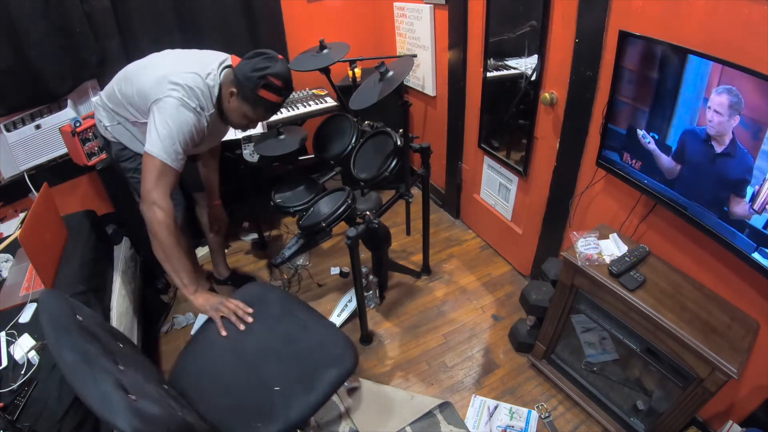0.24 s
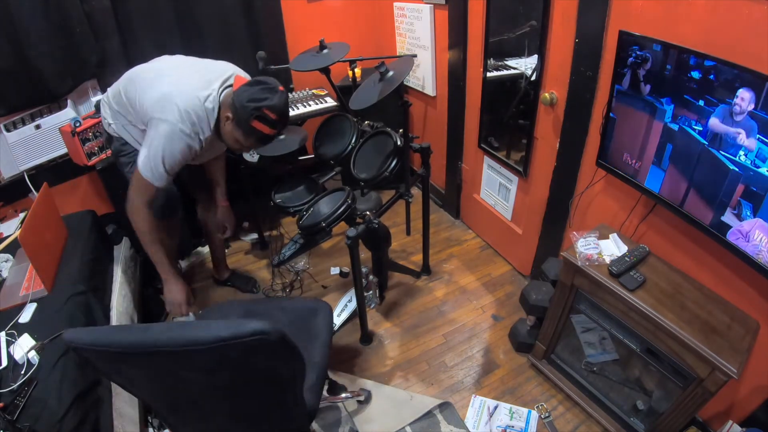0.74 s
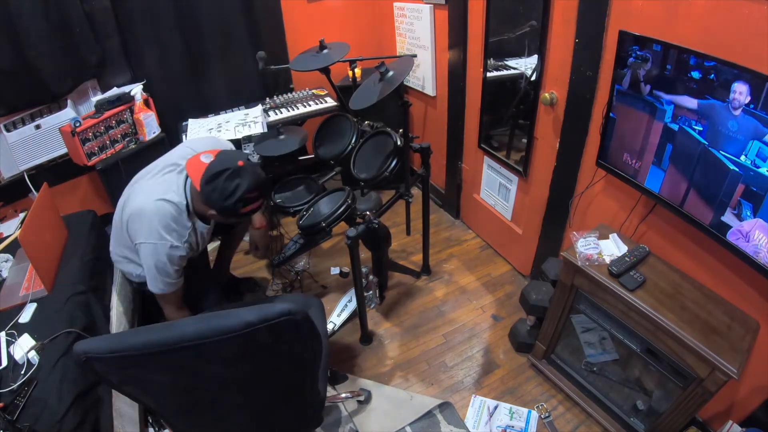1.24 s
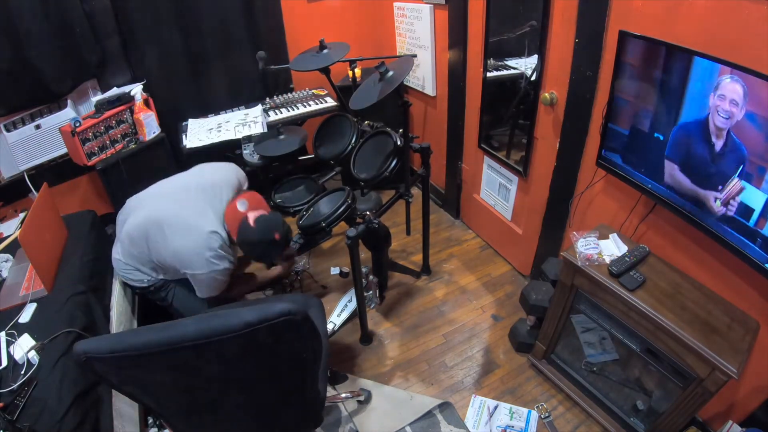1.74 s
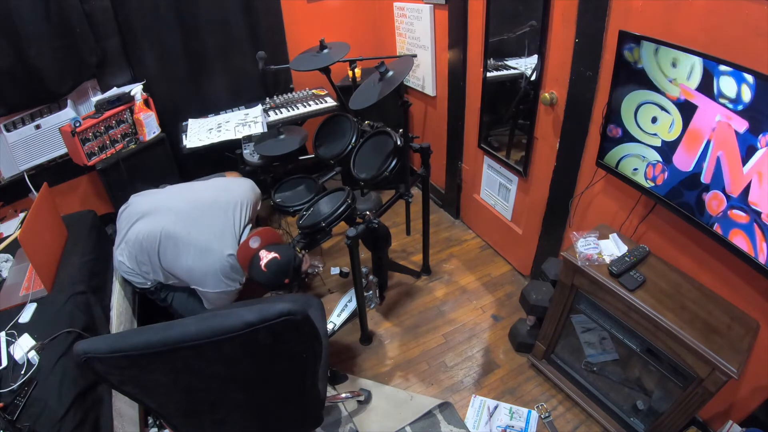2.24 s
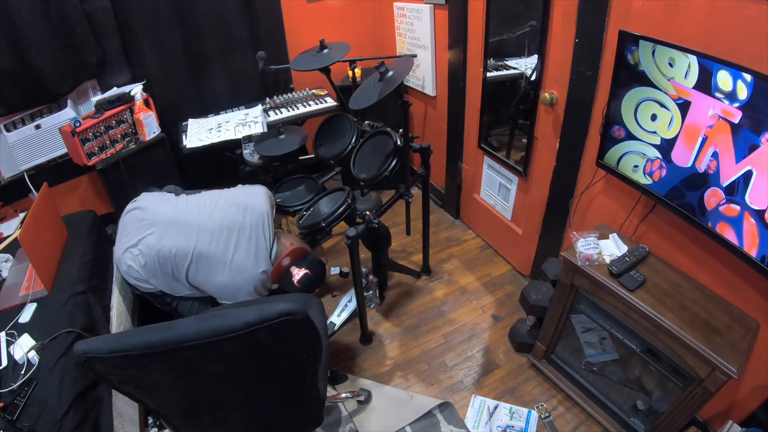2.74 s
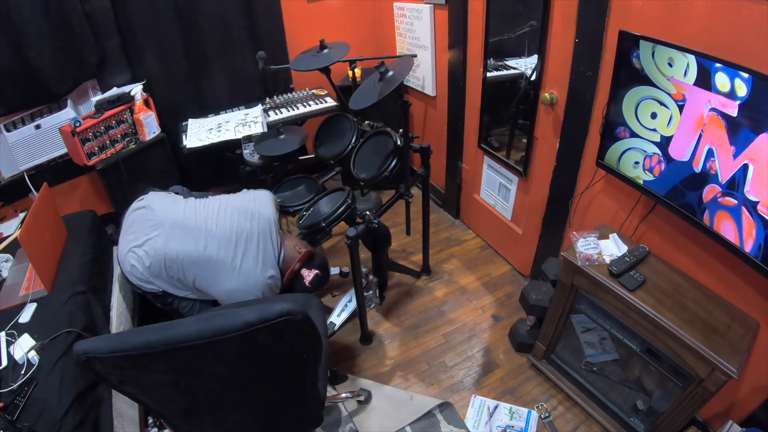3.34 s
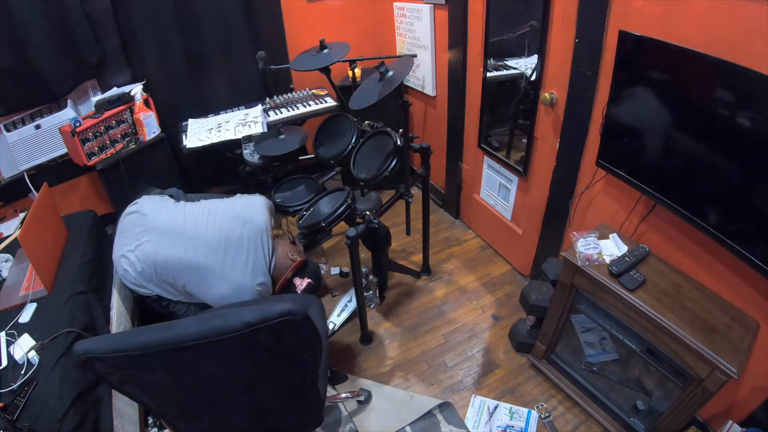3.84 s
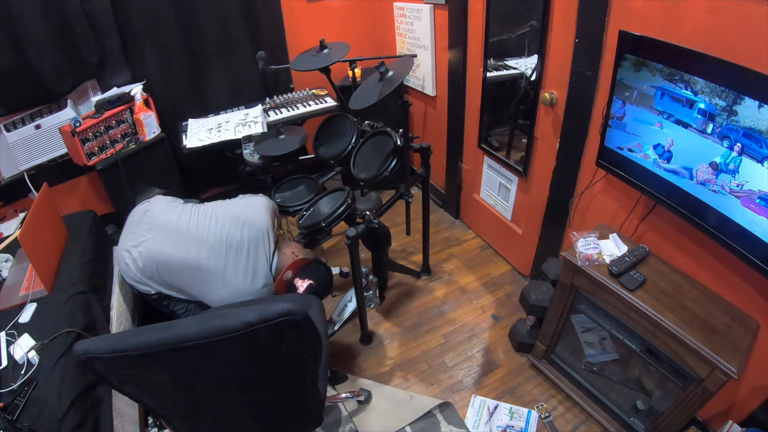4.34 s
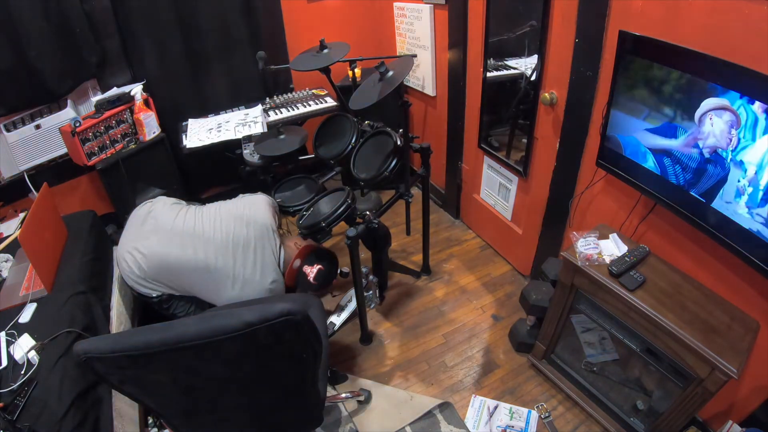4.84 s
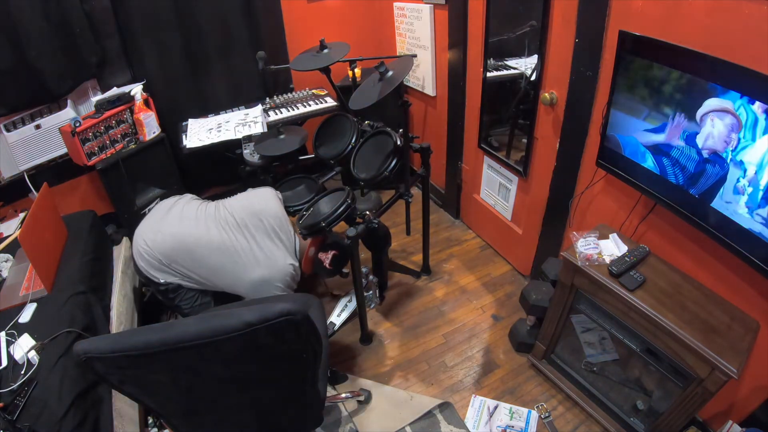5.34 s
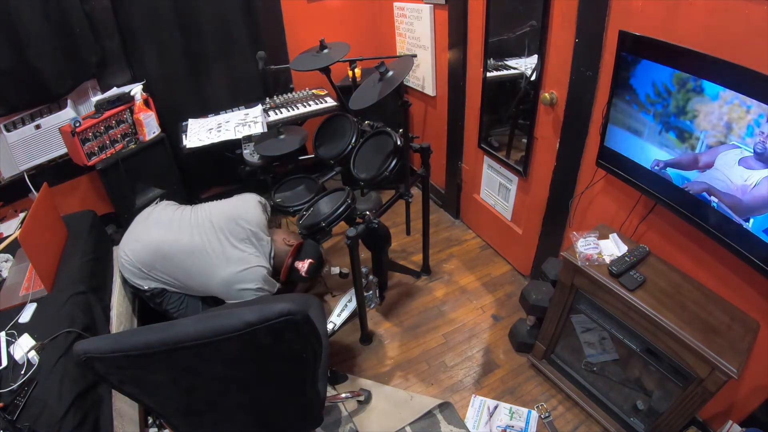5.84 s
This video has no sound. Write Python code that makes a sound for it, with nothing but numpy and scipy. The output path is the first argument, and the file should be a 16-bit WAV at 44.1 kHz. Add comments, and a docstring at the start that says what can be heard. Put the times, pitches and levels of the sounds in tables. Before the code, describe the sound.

Cloth and cables rustle as hard parts knock on a wooden floor, with a brief metallic rattle early and a heavy low thump late.

```python
"""Someone pushes a chair aside and kneels on a wooden floor to handle stands and cables in a small, damped
room. Cloth and cables rub: noise made of tiny slips. Hard parts knock and scuff: short noise bursts that set
parts ringing. Other parts creak or ring as brief tones, and a loose metal part rattles as a run of short pings.
Feet and knees thump the boards: soft pushes set low floor tones ringing. A faint hum of air, made of coloured
noise, lies below."""
import sys
import numpy as np
from scipy import signal
from scipy.fft import rfft, irfft
from scipy.io import wavfile
from scipy.ndimage import uniform_filter1d

SR = 44100
rng = np.random.default_rng(int(sys.argv[2]) if len(sys.argv) > 2 else 0)


def transcribe(u):
    """Save the signal u as a 16-bit wav file named by the first command-line argument.

    u: samples, shape (n,) or (channels, n), limited to [-1, 1]; the rate is SR.
    q: integer samples, one column per channel.
    """
    v = np.clip(np.atleast_2d(u).T, -1, 1)
    q = np.round(v * 32767).astype(np.int16)
    wavfile.write(sys.argv[1], SR, q)


N = 269010
TIME_S = np.arange(N) / SR
HZ = np.maximum(np.arange(N // 2 + 1) * SR / N, 1)   # frequencies of the spectrum, kept above zero

# Rubbing of cloth and cables: t/s, level of hard parts/dB, sheen above hard/dB
RUBBING = [(0, -54.5, -1), (.33, -49.5, -1), (0.511, -55.5, 4.5), (.61, -63.5, 1), (.79, -81, 10),
           (1.001, -58.5, -2), (1.06, -69.5, 5.5), (1.15, -70.5, 8.5), (1.34, -66.5, 9), (1.39, -48.5, -1),
           (1.51, -61, 4.5), (1.87, -71, -0.5), (1.99, -60, 6), (2.12, -54.5, 4), (2.299, -59, 5),
           (2.5, -74, 4.5), (2.61, -63.5, 1.5), (2.8, -75.5, 8), (2.938, -73, -1.5), (3.65, -79.5, 4.5),
           (3.88, -81, 6), (4.04, -58, 2.5), (4.16, -65.5, 0), (4.4, -68, -1), (4.55, -69, -10.5),
           (4.69, -64.5, 3), (4.95, -63.5, 4.5), (5.08, -68.5, 5), (5.2, -68.5, 1), (5.44, -70, 5),
           (5.601, -63, 0), (5.78, -64.5, -2.5), (5.948, -82, 6.5), (6.1, -81.5, 5)]
# How alike the rubbing is in left and right: f/Hz, likeness (1 same, -1 opposite)
RUBBING_LIKENESS = [(200, 0.74), (1000, 0.19), (4000, 0.64), (12000, 1)]
RUB_WOOD_DB, RUB_WOOD_FOLLOWS = -68.5, 0.54   # wood at mean rubbing, and its share of the swing in dB
RUB_PLASTIC_DB = -6   # above hard
# A knock leaves loose things stirring: level above the knock, and its fade
STIR_DB, STIR_FADE_DB_PER_S = -14, 177.5
# Share of the stirring in hard, wood, plastic, sheen: level/dB
STIR_COLOUR_DB = [2, -11.5, -4.5, -7.5]

# Colour of small hard parts: f/Hz, relative level/dB
HARD_COLOUR = [(1500, -13), (2000, -0.5), (2600, 2.5), (3500, 1.5), (4700, 0.5), (6000, -8), (8000, -28.5)]
# Resonances of wood: f/Hz, width/Hz, relative level/dB
WOOD_RESONANCES = [(288, 16.5, -1.5), (345.5, 44.6, 1), (435, 41, 0.5), (516.6, 39, -8.5),
                   (562.8, 14, -2.5), (680, 111, -9), (780, 70, -19)]
# Colour of plastic shells: f/Hz, relative level/dB
PLASTIC_COLOUR = [(550, -35), (700, 1.5), (900, 6), (1300, 3), (1700, 3.5), (2200, -17.5)]
# Colour of fine surface texture: f/Hz, relative level/dB
SHEEN_COLOUR = [(4000, -25), (6000, -3), (7500, -3.5), (9500, -2), (12000, -6), (14000, -10.5),
                (16000, -3.5)]

# Colour of the air: f/Hz, relative level/dB
AIR_COLOUR = [(15, -22.5), (25, -4), (64, -5), (212, -10), (293, 1.5), (354, 5), (516, -8), (887, -19),
              (1520, -1.5), (2110, -9.5), (4740, -17.5), (6920, -59.5), (9570, -12.5), (13200, -16),
              (16000, -24.5)]
# How alike the air is in left and right: f/Hz, likeness (limited to -0.99 .. 0.99 in use)
AIR_LIKENESS = [(60, 0.84), (180, -0.53), (550, -0.55), (1650, -0.82), (4970, -1.4), (15000, -1.1)]

# Scuffs, at their strongest moment: t/s, hard level/dB, wood, plastic and sheen above hard/dB (three columns),
# width/s, small part f/Hz
SCUFFS = [(0.0324, -52.5, 11.5, -5, 12, 0.012, 4460), (0.1344, -59, -3, 5.5, 5, 0.033, 1200),
          (0.2014, -55.5, 2.5, 1.5, 13, 0.027, 5520), (0.2674, -61, 14.5, -11, 8, 0.023, 3200),
          (0.5574, -61.5, -0.5, -2.5, -0.5, 0.044, 1350), (0.8272, -40, 3, -15, -3.5, 0.02, 2200),
          (0.961, -71, 22, -7, 9, 0.062, 4560.0), (1.389, -63, 15, 0, -1, 0.024, 1510.0),
          (1.426, -48, 5, 3, -2, 0.024, 4680), (1.4694, -56.5, 3, -2, -23, 0.03, 2170),
          (1.64, -68.5, 1, -20, 12.5, 0.034, 2920.0), (1.9686, -59.5, 5, -4.5, -24, 0.037, 3460),
          (2.0994, -57.5, -24, -17, -7, 0.056, 1640), (2.271, -58, -15, -17, -14, 0.011, 3130),
          (2.3986, -66, -16, -4, 8, 0.064, 5760), (2.6494, -69.5, 11, -14, 1, 0.016, 2180.0),
          (2.7213, -63.5, 3, -7.5, 3, 0.078, 3760), (3.2865, -68, 12, 0, -4, 0.031, 2330),
          (4.0444, -70, -21.5, -4.5, 5.5, 0.03, 1550.0), (4.2344, -60, -23, -18, -3.5, 0.03, 2590.0),
          (4.3294, -67, -5, -8, -36, 0.11, 2560), (4.459, -75, 14, 0, -28, 0.021, 1770),
          (4.8259, -56.5, -22, -17, -9, 0.022, 2610), (4.878, -56.5, -3, -6, -8, 0.021, 1400),
          (5.011, -67, 7, -3, 6, 0.033, 3400.0), (5.3325, -56.5, 10, 0.5, -4, 0.022, 1420),
          (5.364, -53.5, 3, -12, -7.0, 0.0078, 2380), (5.7174, -61.5, 10.5, 2.5, -18.0, 0.016, 3740),
          (5.8082, -56.5, -24, -27, 3.5, 0.025, 3900)]
# Knocks: t/s, hard level/dB, wood, plastic and sheen above hard/dB (three columns), contact/s, small part f/Hz
KNOCKS = [(0.3649, -30.5, 10.5, -30, 6, 0.0073, 3730), (0.3728, -29.5, 0, -4.5, 4, 0.012, 3500),
          (0.6431, -44, -32, -2.5, -9, 0.012, 4320), (0.803, -51, -18, 0, -14.5, 0.022, 3780),
          (0.8242, -33.5, -7, -6.5, -17, 0.011, 2170), (0.9174, -59, 21, 8, 5.5, 0.011, 3730.0),
          (1.1594, -46.5, 12, 4, -43, 0.0094, 2300), (1.188, -51, 6, 4.5, -34, 0.012, 2830),
          (1.267, -54, 8.5, 1.5, -15, 0.011, 1550), (1.408, -44, 3, -14.0, 6.5, 0.023, 4500),
          (1.934, -62, -7, -2, -12, 0.019, 3440.0), (2.0565, -56, -24, -21, 5, 0.022, 1600),
          (2.168, -48, 4.5, 0.5, -3.0, 0.022, 1317), (2.3355, -59.5, -22, -15, 8, 0.024, 4440),
          (2.6666, -66, 4, -1, 2, 0.0092, 2180.0), (2.693, -60, 16, 7, -6, 0.011, 2150),
          (2.7774, -59.0, 12.5, 5.0, -9, 0.007, 1420), (3.8468, -66.5, 1.5, 3.5, -2, 0.021, 1470),
          (4.137, -59.5, -20, -12, -11, 0.0063, 3330), (4.2476, -42.5, -12.5, -12, -13, 0.01, 2600.0),
          (4.851, -50.5, 10, -1, -13, 0.013, 4600), (5.0481, -41.5, 1.5, -1.5, -39, 0.013, 2790),
          (5.674, -51.0, 3.5, -11, -7, 0.02, 2400), (5.7824, -47, -37, -30, -11.5, 0.0061, 2540),
          (5.81, -51.5, 1, 3, -11, 0.0036, 3730), (5.897, -57.5, 5.0, -4.5, -28, 0.014, 3500)]
# Ringing of the touched frame: f/Hz, relative level/dB, time to fall 60 dB/s
FRAME_MODES = [(350.5, -8.5, 0.14), (419.4, -7.5, 0.24), (550.7, -10, 0.056), (760, -12, 0.028)]
FRAME_VARIES_DB, SCATTER_DB = 4.5, 4.5   # chance in ring strength; contacts fall a little left or right
PART_T60_S = .018   # time for the touched small part to fall 60 dB
KNOCK_ATTACK = .1   # share of the contact time

# Thumps on the boards: t/s, level/dB, middle modes above/dB, upper modes above/dB, push/s, ring time factor
THUMPS = [(0.015, -56, -21.0, -16, 0.0054, 0.72), (0.099, -50, -5.0, -29.0, 0.016, 1.0),
          (0.181, -46, -30, -22, 0.011, 1.0), (0.372, -37, -22, -3, 0.0049, 0.94),
          (0.39, -35.5, -21, 5.5, 0.0071, 1.0), (0.512, -34, -8.5, -18, 0.0204, 0.83),
          (0.837, -71, 0, 7, 0.008, 0.8), (0.944, -54, -8, -4, 0.0093, 1),
          (1.002, -32.5, -37.0, -6, 0.0049, 0.93), (1.025, -37, 5, -29, 0.002, 0.43),
          (1.1, -46, -8, -33.0, 0.011, 0.57), (1.156, -53, -23, -26, 0.004, 0.92),
          (1.276, -61, -6, 4, 0.008, 0.74), (1.377, -33.5, -20.0, -8, 0.0097, 0.91),
          (1.447, -42.5, 4, -1.5, 0.0051, 0.79), (1.611, -67.0, -14.0, -31.0, 0.0064, 0.94),
          (1.964, -79.0, -3.0, 17, 0.0042, 1.0), (2.124, -57.0, -15.0, -17.0, 0.008, 0.47),
          (2.172, -72.5, -6.0, 22, 0.0035, 0.8), (2.205, -77, 9, 24, 0.0063, 0.68),
          (2.704, -75.5, -6.0, 19, 0.0087, 1.0), (2.768, -67.5, 2, -15, 0.0043, 0.57),
          (3.254, -60.0, -4.5, 4, 0.013, 0.6), (3.296, -41.5, 8.5, 2.5, 0.01, 0.76),
          (4.092, -66, -11.0, -28, 0.013, 0.87), (5.012, -66.5, -8.0, 12, 0.0059, 0.59),
          (5.114, -43.5, -15, -44, 0.015, 0.8), (5.349, -21.5, -10, -10.5, 0.019, 0.81),
          (5.391, -32.5, -28.0, -36, 0.0077, 0.47), (5.44, -50.5, -4, -44, 0.006, 1.0),
          (5.701, -83.0, 2.0, 29.5, 0.0032, 0.91), (5.799, -70, -15.0, -20.0, 0.0095, 0.7),
          (5.891, -83.5, 2.0, 22.5, 0.0068, 0.86)]
# Low floor modes: f/Hz, relative level/dB, time to fall 60 dB before the ring time factor/s, left above right/dB
BOARDS_LOW = [(46.3, 2.5, .25, -9), (67, 8, .2, 6.5)]
# Middle floor modes, same columns: f/Hz, relative level/dB, time to fall 60 dB/s, left above right/dB
BOARDS_MID = [(72, 0, 0.158, 0.5), (102, -5.5, 0.21, 12), (118, -8.5, 0.13, -7)]
# Upper floor modes, same columns: f/Hz, relative level/dB, time to fall 60 dB/s, left above right/dB
BOARDS_HIGH = [(154, 2, 0.15, 9), (181.5, -1, 0.14, 5.5), (254, -1.5, 0.091, -16)]

# Brief tones: most from a part slipping under load, one (at 0.366 s) the chair frame ringing after a knock:
# t/s, starting f/Hz, peak level before the room/dB, length/s
CREAKS = [(0.109, 1228, -56.5, 0.11), (0.366, 873, -28, 0.018), (0.802, 349, -37.5, 0.048),
          (0.903, 346, -45.5, 0.047), (1.395, 343, -24.5, 0.02), (1.42, 782, -31.5, 0.007),
          (1.424, 4610, -43, 0.042), (2.174, 257, -44, 0.051), (2.267, 2774, -55.5, 0.026),
          (4.253, 339, -53.5, 0.087), (4.443, 338, -49.5, 0.013), (4.848, 364, -43, 0.041),
          (5.049, 369, -38, 0.015)]

# Loose metal part, typical values along its run: t/s, bounces per second, ping f/Hz, level/dB
RATTLE = [(0.364, 99, 3770, -19), (0.381, 129, 3550, -22), (0.398, 113, 3500, -39),
          (0.429, 98, 3680, -33.5), (0.461, 108, 3914, -33), (0.486, 130, 4050, -47), (.51, 120, 4200, -67)]
PING_S = .0011   # rise and decay time of a ping
RATTLE_UPPER_HZ, RATTLE_UPPER_DB = 9300, -11.5   # a higher mode of the loose part: typical pitch, level

# How fast the room dies away: f/Hz, time to fall 60 dB/s
ROOM_T60 = [(200, 0.14), (1000, 0.16), (4000, 0.079), (12000, 0.16)]
# How alike the reflections are in left and right: f/Hz, likeness (limited to -0.99 .. 0.99 in use)
ROOM_LIKENESS = [(200, 1), (1000, 0.64), (4000, 0.35), (12000, 1)]

# Treble balance of the microphone ports: f/Hz, left above right/dB
MIC_BALANCE = [(3000, 0.0), (6000, 1.5), (9000, -4.5), (14000, -6)]
# Treble phase of the microphone ports: f/Hz, lead of left over right/rad
MIC_TURN = [(3000, 0), (8000, .2), (10000, 1.1), (14000, 1.3)]


def from_db(db):
    """Turn decibels into a plain factor."""
    return 10 ** (np.asarray(db) / 20)


def rms_one(x):
    """Scale to an average strength (rms) of 1."""
    return x / np.sqrt(np.mean(np.abs(x) ** 2) + 1e-20)


def at_hz(points, hz):
    """Read a table between its points, along a logarithmic frequency scale."""
    table = np.array(points)
    return np.interp(np.log(hz), np.log(table[:, 0]), table[:, 1])


def coloured(x, gain):
    """Filter by a gain over frequency, scaled so that white noise keeps its rms."""
    return irfft(rfft(x) * rms_one(gain), N)


def alike(mid, side, points):
    """Left and right from two spectra, as alike as the table says."""
    likeness = np.clip(at_hz(points, HZ), -.99, .99)
    shared = np.sqrt(.5 + likeness / 2) * mid
    opposed = np.sqrt(.5 - likeness / 2) * side
    return shared + opposed * [[1], [-1]]


def panned(db):
    """Gains for left and right that differ by this many decibels."""
    return from_db(np.array([[.5], [-.5]]) * db)


def ring(force, hz, t60):
    """A resonance struck by a force: a unit click sets a sine of starting height 1 ringing and fading."""
    decay = from_db(-60 / (t60 * SR))
    turn = 2 * np.pi * hz / SR
    feedback = [1, -2 * decay * np.cos(turn), decay * decay]
    return signal.lfilter([0, np.sin(turn)], feedback, force + 1e-18)


def clumps(spread_db, size):
    """A strength that wavers by chance, smoothed over `size` samples."""
    slow = uniform_filter1d(rng.standard_normal(N), size=size)
    return rms_one(from_db(spread_db * rms_one(slow)))


def grains(spread_db, size):
    """Dense tiny slips whose strength comes in clumps of `size` samples."""
    return rms_one(rng.standard_normal(N) * clumps(spread_db, size))


def materials(hard, wood, plastic, sheen):
    """Contact forces sound through hard small parts, wood resonances, plastic shells and fine surface texture."""
    bells = 0
    for k, (hz, width, db) in enumerate(WOOD_RESONANCES):
        bell = from_db(db) / (1 + 1j * (HZ - hz) / (width / 2))
        bells = bells + bell * (-1) ** k   # signs alternate
    steep = 1 / (1 + (240 / HZ) ** 10)   # the wood radiates little below its first resonance
    out = coloured(wood, bells * steep)
    for force, colour in ((hard, HARD_COLOUR), (plastic, PLASTIC_COLOUR), (sheen, SHEEN_COLOUR)):
        out = out + coloured(force, from_db(at_hz(colour, HZ)))
    return out


def patchy(x, spread_db):
    """Shifting narrow patches of the spectrum lift and sink for a moment, keeping the power on average."""
    cells = signal.stft(x, nperseg=512)[2]
    field = uniform_filter1d(rng.standard_normal(cells.shape[1:]), size=4, axis=0)   # across frequency
    field = uniform_filter1d(field, size=14, axis=1)   # across time
    patch_db = spread_db * rms_one(field) - spread_db ** 2 * np.log(10) / 20
    return signal.istft(cells * from_db(patch_db), nperseg=512)[1][:, :N]


def rubbing():
    """Continuous slips follow the movement, spread over a wide patch of floor; each knock stirs them up briefly."""
    s, level_db, sheen_db = np.transpose(RUBBING)
    hard = np.interp(TIME_S, s, level_db)
    wood = RUB_WOOD_DB + RUB_WOOD_FOLLOWS * (hard - hard.mean())
    sheen = hard + np.interp(TIME_S, s, sheen_db)
    moving = from_db([hard, wood, hard + RUB_PLASTIC_DB, sheen])

    kicks = np.zeros(N)
    kicks[[round(row[0] * SR) for row in KNOCKS]] = from_db([row[1] + STIR_DB for row in KNOCKS])
    stir = signal.lfilter([1], [1, -from_db(-STIR_FADE_DB_PER_S / SR)], kicks + 1e-18)

    gains = np.hypot(moving, from_db(STIR_COLOUR_DB)[:, None] * stir)
    gains = [g * clumps(spread_db=2.5, size=2500) for g in gains]   # each material wavers on its own
    near, wide = [materials(*[g * grains(spread_db=1.0, size=300) for g in gains]) for _ in range(2)]
    return irfft(alike(rfft(near), rfft(wide), RUBBING_LIKENESS), N)


def air():
    """The background of the room and the microphones: steady noise shaped over frequency."""
    mid, side = rfft(rng.standard_normal((2, N))) * from_db(at_hz(AIR_COLOUR, HZ))
    return from_db(-65.5) * rms_one(irfft(alike(mid, side, AIR_LIKENESS), N))


def contacts(rows, shape, spread_db, frame_db, part_db):
    """Bursts of small contacts drive the materials; the frame and the touched part ring on."""
    force, rings = np.zeros((4, 2, N)), np.zeros((2, N))
    slips = grains(spread_db, size=60)
    chance = rng.standard_normal((len(rows), 1 + len(FRAME_MODES)))
    for (s, db, wood_db, plastic_db, sheen_db, length, part_hz), (side, *strengths) in zip(rows, chance):
        start = max(0, round((s - 2 * length) * SR))
        at = slice(start, round((s + 2 * length + .2) * SR))
        weight = shape((TIME_S[at] - s) / length)
        burst = rms_one(slips[at] * weight) * np.sqrt(np.mean(weight ** 2))
        burst = burst * panned(SCATTER_DB * side)

        colour_db = np.array([0, wood_db, plastic_db, sheen_db])
        force[:, :, at] += from_db(db + colour_db)[:, None, None] * burst
        for (hz, mode_db, t60), strength in zip(FRAME_MODES, strengths):
            ring_db = db + wood_db + frame_db + mode_db + FRAME_VARIES_DB * strength
            rings[:, at] += from_db(ring_db) * ring(burst, hz, t60)
        rings[:, at] += from_db(db + part_db) * ring(burst, part_hz, PART_T60_S)
    low_cut = signal.butter(3, 230, "high", fs=SR, output="sos")
    return materials(*force) + signal.sosfilt(low_cut, rings)


def scuffs():
    """A short slide: a burst of contacts that swells and fades."""
    return contacts(SCUFFS, lambda u: np.exp(-u * u), spread_db=1.5, frame_db=-35, part_db=-22)


def thumps():
    """A soft push sets floor modes ringing; higher modes feel a shorter part; weight left on the boards damps them."""
    boom = np.zeros((2, N))
    for s, db, middle_db, upper_db, push, free in THUMPS:
        at = boom[:, round(s * SR):round((s + .6) * SR)]   # a view: adding here adds to boom
        groups = ((0, BOARDS_LOW), (middle_db, BOARDS_MID), (upper_db, BOARDS_HIGH))
        for k, (above_db, modes) in enumerate(groups):
            samples = int(np.clip(push, .002, .03) * SR / (k + 1))
            half_sine = np.sin(np.linspace(0, np.pi, samples))
            force = np.pad(half_sine / half_sine.sum(), (0, at.shape[1] - samples))
            for hz, mode_db, t60, pan_db in modes:
                at -= from_db(db + above_db + mode_db) * ring(force, hz, t60 * free) * panned(pan_db)
    low_cut = signal.butter(3, 32, "high", fs=SR, output="sos")
    return signal.sosfilt(low_cut, boom)


def creaks():
    """A brief tone that swells and stops, its pitch gliding a little: a part slipping under load, or the frame
    ringing after a knock."""
    out = np.zeros(N)
    for s, hz, db, length in CREAKS:
        start, bend = rng.random(2)
        u = np.linspace(0, 1, int(length * SR))   # from start to end of the creak
        pitch = hz * (1 + 0.06 * (bend - .5) * u)
        phase = 2 * np.pi * (start + np.cumsum(pitch) / SR)
        out[round(s * SR):][:len(u)] += from_db(db) * np.sin(np.pi * u) ** 0.75 * np.sin(phase)
    return out


def rattle():
    """A loose part bounces quickly and nearly evenly, each bounce a short ping of two modes."""
    s, per_s, hz, db = np.transpose(RATTLE)
    out = np.zeros(N)
    t = np.arange(int(.03 * SR)) / SR
    swell = t / PING_S * np.exp(1 - t / PING_S)
    at = s[0]
    for late, size_db, detune in rng.standard_normal((40, 3)):
        if at < s[-1]:
            main_hz = np.interp(at, s, hz) * (1 + 0.052 * detune)
            upper_hz = RATTLE_UPPER_HZ * (1 + .03 * late)
            upper = from_db(RATTLE_UPPER_DB) * np.sin(2 * np.pi * upper_hz * t)
            ping = (np.sin(2 * np.pi * main_hz * t) + upper) * swell
            out[round(at * SR):][:len(t)] += from_db(np.interp(at, s, db) + 1.4 * size_db) * ping
        at += (1 + 0.071 * late) / np.interp(at, s, per_s)
    return out


def knocks():
    """Hard parts meet: a burst of contacts with a quick start, dying over the contact time."""
    def shape(u):
        return np.clip(u / KNOCK_ATTACK, 0, 1) * np.exp(-np.abs(u))
    return contacts(KNOCKS, shape, spread_db=2.5, frame_db=-29, part_db=-27.0)


def room(x, wet_db):
    """Direct sound plus dense reflections, each octave dying at its own pace."""
    white = rng.standard_normal((2, N))
    tails = 0
    for hz in 180 * 2.0 ** np.arange(7):
        t60 = at_hz(ROOM_T60, hz)
        fade = (TIME_S > .002) * from_db(-60 * np.minimum(TIME_S, 1) / t60)   # reflections start after 2 ms
        octave = np.exp(-2 * np.log2(HZ / hz) ** 2)
        strength = np.sqrt(t60 * SR / np.log(1e6))   # evens out long and short tails
        tails = tails + rfft(white * fade) / strength * octave
    return x + from_db(wet_db) * irfft(rfft(x) * alike(*tails, ROOM_LIKENESS), N)


def scene():
    """Handling sounds go through the room; rustle, thumps and air are added as they are."""
    rustle = patchy(rubbing(), spread_db=2.5)
    background = patchy(air(), spread_db=1.2)
    handling = scuffs() + creaks() + rattle() + knocks()
    return rustle + background + thumps() + room(handling, wet_db=-2.5)


def record(dry):
    """The two microphone ports differ in the treble; the top is cut."""
    turn = np.exp(.5j * at_hz(MIC_TURN, HZ) * [[1], [-1]])
    ports = panned(at_hz(MIC_BALANCE, HZ)) * turn
    top_cut = signal.cheby2(12, 60, 16100, fs=SR, output="sos")   # 60 dB down from 16.1 kHz up
    return signal.sosfilt(top_cut, irfft(rfft(dry) * ports, N))


dry = scene()
out = record(dry)
transcribe(out)
```